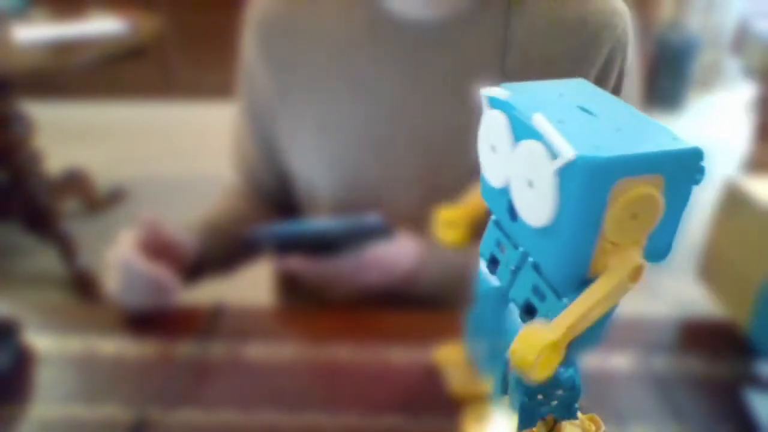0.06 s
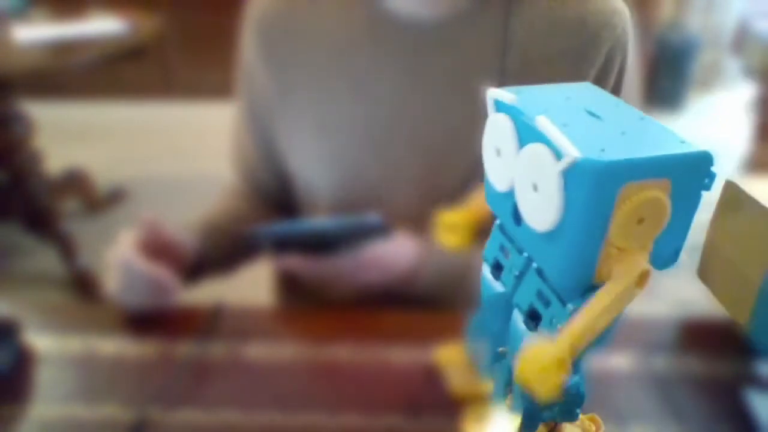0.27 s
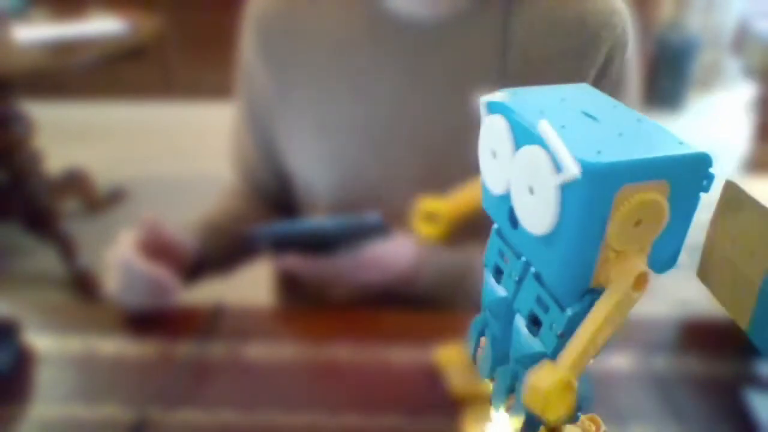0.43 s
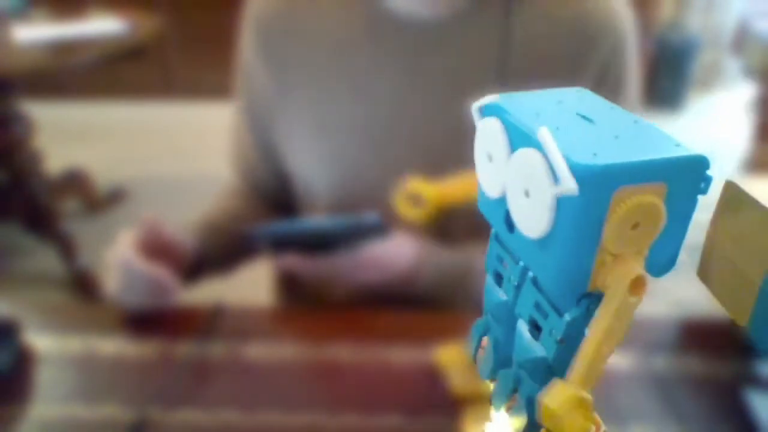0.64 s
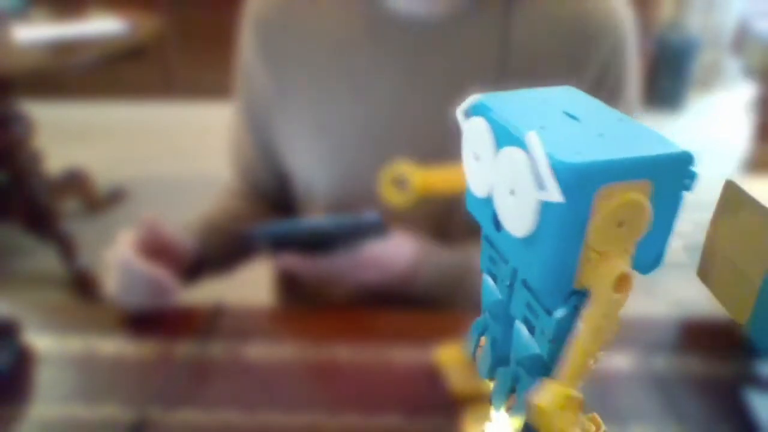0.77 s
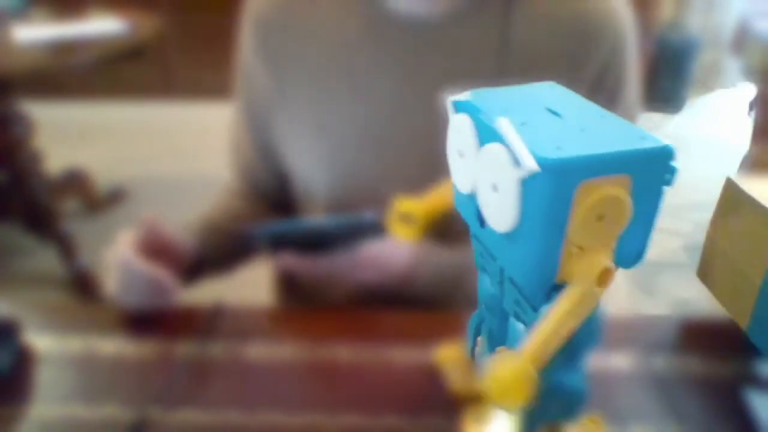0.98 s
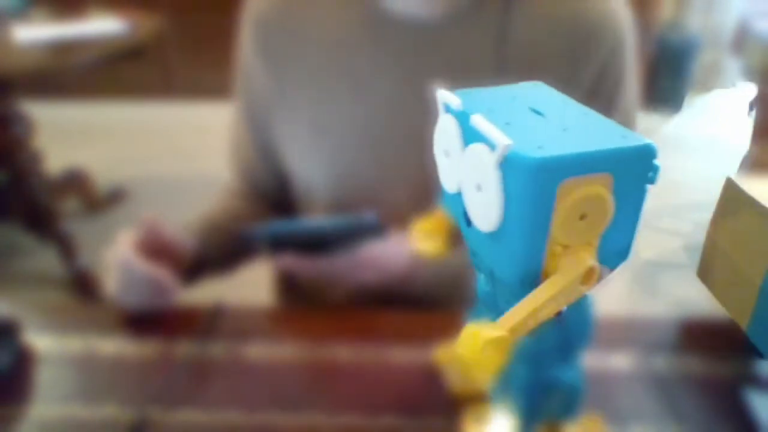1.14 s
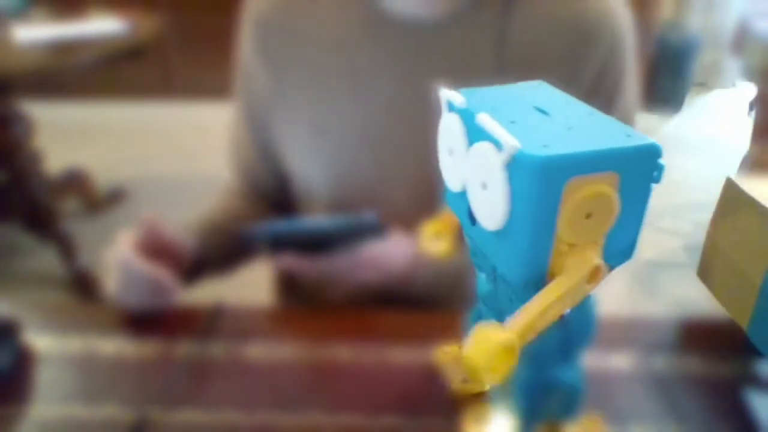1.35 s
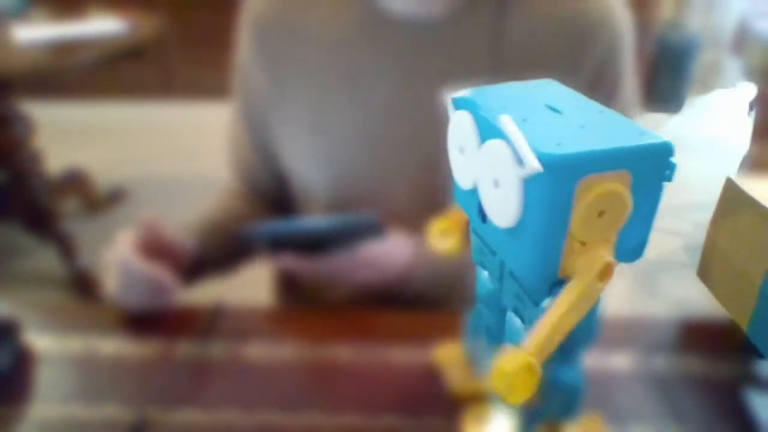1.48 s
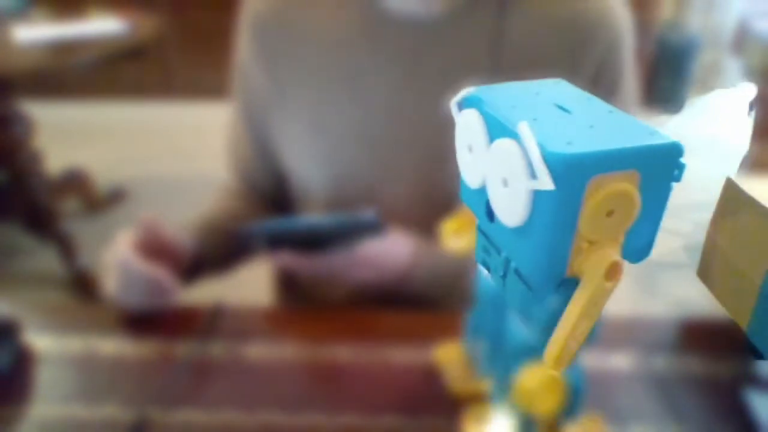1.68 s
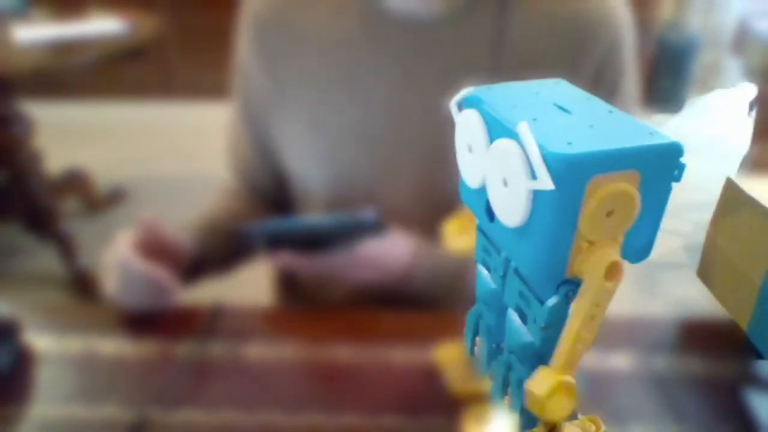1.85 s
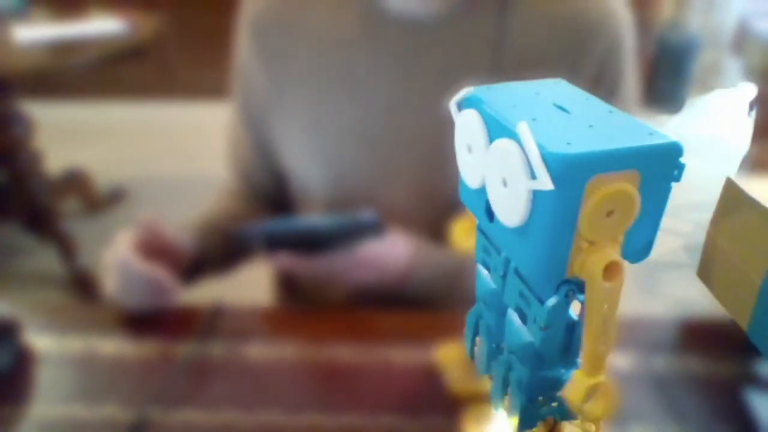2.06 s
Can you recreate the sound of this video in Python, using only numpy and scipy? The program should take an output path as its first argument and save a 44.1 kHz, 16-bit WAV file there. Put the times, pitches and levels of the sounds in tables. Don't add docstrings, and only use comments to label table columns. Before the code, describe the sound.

Tiny geared servos of a plastic robot buzz harshly up close, first in long rattly whirs for about a second, then in brief, quieter twitches, in a quiet room through a narrow-band microphone.

```python
import sys
import numpy as np
from scipy import signal
from scipy.fft import rfft, irfft
from scipy.io import wavfile
from scipy.ndimage import uniform_filter1d

SR = 44100
rng = np.random.default_rng(int(sys.argv[2]) if len(sys.argv) > 2 else 0)


def int16_out(signal):
    q = np.round(np.clip(np.atleast_2d(signal).T, -1, 1) * 32767)
    wavfile.write(sys.argv[1], SR, q.astype(np.int16))


def voltage_ratio(level):
    return 10 ** (np.asarray(level, float) / 20)


N = 93403

# [f/Hz, width/Hz, level/dB]
LEG_CASE = [(3190, 120, -11.5), (3837, 390, -11.5), (3940, 100, -11.5), (4340, 170, -9), (4904, 215, -2),
            (5280, 1400, -2.5), (5288, 260, -2), (5864, 220, 2), (6176, 300, -5.5), (6410, 100, -4),
            (6870, 190, -6.5)]
ARM_CASE = [(3234, 180, -4.5), (3540, 250, -10.5), (3836, 470, -6), (4560, 620, -6.5), (5235, 460, -0.5),
            (5740, 780, -8), (6320, 230, -2.5), (6820, 690, -11.5)]
HIP_CASE = [(3887, 190, -8.5), (4300, 300, -30), (5170, 320, -0.5), (5700, 400, -25), (6860, 500, -15)]
BROW_CASE = [(4600, 590, -17.5), (5480, 370, -6), (5840, 330, -1.5), (6730, 170, -3)]
FOOT_CASE = [(3230, 250, -11), (3775, 94, -9.5), (4450, 180, -3), (5100, 330, 2), (5600, 220, 0.5),
             (5800, 390, -5.5), (6230, 250, -16.5)]
IDLE_CASE = [(3357, 240, -7.5), (4170, 900, -13.5), (5280, 390, 0.5), (5440, 690, -4.5), (6070, 390, -7.5),
             (7040, 600, -17)]
# [f/Hz, width/Hz, level/dB]
BODY_MODES = [(1463, 190, -2), (1674, 300, -7.5), (2040, 560, -5), (2290, 160, -9.5)]
# [t/s, level/dB, body share/dB]
LEG_MOVES = [
    [(0, -27.5, -28), (.025, -35.5, -30.5), (.05, -36, -27), (.12, -35.5, -27.5), (.176, -35, -26),
     (.2, -41, -16.5), (.22, -48, -19)],
    [(.795, -44, -18.5), (.812, -34.5, -22), (.842, -32, -25), (.862, -32, -23.5), (.885, -34, -28.5),
     (.91, -37.5, -22), (.95, -35.5, -26), (1.0, -35.5, -34)],
    [(1.0, -34.5, -26), (1.04, -36.5, -33.5), (1.065, -36, -37), (1.09, -37, -32.5), (1.155, -37, -26),
     (1.19, -40, -23.5), (1.215, -48.5, -20)],
]
ARM_MOVES = [
    [(.25, -52.5, -18), (.286, -46.5, -13), (.33, -40.5, -15), (.37, -43.5, -9), (.4, -41, -16.5),
     (.44, -42, -21), (.472, -44.5, -14), (.52, -37.5, -24.5)],
    [(.52, -40, -14.5), (.575, -39.5, -16.5), (.62, -37, -17.5), (.655, -39, -16), (.68, -36, -18),
     (.708, -35.5, -24.5), (.745, -51.5, -13), (.775, -42, -24), (.79, -49.5, -26.5)],
]
# [t/s, length/s, level/dB, body share/dB]
LEG_PUSHES = [
    (0.224, 0.017, -39.5, -23),
    (1.354, 0.043, -50, -18),
    (1.497, 0.054, -50, -27),
]
HIP_PUSHES = [(1.226, 0.008, -44.5, -20.5), (1.251, 0.008, -42.5, -24), (1.288, 0.016, -52, -27),
              (1.311, .02, -40, -26.5), (1.337, .005, -45.5, -16), (1.363, 0.018, -44, -38),
              (1.389, 0.004, -47, -20), (1.4, 0.012, -49, -19.5), (1.438, 0.046, -50.5, -37),
              (1.503, .014, -46.5, -21.5), (1.546, 0.023, -51, -36), (1.596, 0.013, -51.5, -47),
              (1.61, 0.031, -52, -56)]
BROW_PUSHES = [
    (1.646, 0.017, -46.5, -49),
    (1.675, 0.0026, -42, -47),
    (1.689, 0.023, -40.5, -36.5),
    (1.716, .003, -60.5, -31),
]
FOOT_PUSHES = [
    (1.848, 0.0031, -61.5, -32),
    (1.874, 0.054, -54.5, -20.5),
    (1.9, 0.011, -45, -35.5),
    (1.915, 0.024, -45, -32.5),
    (1.948, 0.014, -48, -26),
    (1.963, 0.038, -54, -23),
    (2.021, 0.029, -50.5, -21.5),
    (2.074, 0.0033, -52, -18),
    (2.086, 0.039, -47, -24),
    (2.108, .02, -60, -3),
]
# [t/s, length/s, f/Hz, level/dB]
PANELS = [(.01, .02, 1440, -59), (.138, .006, 1440, -62), (.164, .008, 1440, -61), (.27, .005, 3170, -44),
          (.298, .025, 3200, -52), (.457, .006, 3700, -46), (.3, .012, 2080, -60), (.385, .022, 474, -69),
          (.41, .011, 3250, -40), (.47, .012, 3200, -50), (.536, .01, 3250, -47), (.553, .008, 3350, -41),
          (.66, .025, 3750, -45), (.609, .01, 3180, -46), (.612, .03, 474, -69), (.676, .018, 3200, -43),
          (.772, .008, 1050, -66), (.829, .008, 3290, -46), (.856, .01, 3750, -45), (.882, .008, 3700, -45),
          (.9, .004, 3150, -51), (.925, .005, 3150, -51), (.948, .004, 3150, -52), (.968, .006, 3150, -50),
          (.988, .004, 3150, -52), (.86, .022, 474, -68), (.97, .015, 1440, -56), (1.061, .008, 3250, -55),
          (1.233, .008, 3930, -48), (1.317, .008, 3850, -48), (1.385, .02, 1065, -72),
          (1.442, .01, 3850, -57), (1.46, .008, 3850, -52), (1.606, .014, 3950, -58),
          (1.63, .01, 4100, -54), (1.848, .01, 2270, -71), (1.915, .028, 1070, -72),
          (2.086, .04, 1070, -66), (2.086, .012, 3790, -56), (2.088, .012, 4350, -53),
          (2.104, .012, 4350, -51), (2.105, .012, 3790, -55)]
# [t/s, length/s, f/Hz, level/dB]
CATCHES = [(.01, .012, 5900, -36), (.127, .005, 5960, -37), (.164, .005, 5200, -38),
           (.231, .012, 5350, -39), (.332, .008, 5150, -39), (.35, .012, 5200, -42),
           (.365, .006, 5250, -36), (.446, .004, 5110, -43), (.487, .012, 5200, -42),
           (.517, .006, 5150, -42), (.546, .012, 5170, -41), (.61, .01, 5150, -38), (.627, .005, 5250, -37),
           (.672, .007, 5100, -39), (.702, .007, 5150, -38), (.773, .004, 5120, -46),
           (.799, .006, 5890, -41), (.811, .005, 5430, -37), (.88, .012, 6050, -39),
           (.947, .005, 5200, -38), (.963, .008, 5750, -39), (.984, .005, 4770, -35),
           (.996, .012, 5850, -38), (1.024, .004, 5000, -37), (1.097, .005, 5350, -38),
           (1.146, .004, 5300, -38), (1.163, .006, 5800, -35), (1.234, .005, 5100, -42),
           (1.3035, .001, 5200, -33), (1.312, .001, 5300, -38), (1.316, .001, 5200, -38),
           (1.321, .004, 5200, -33), (1.388, .002, 5100, -34), (1.442, .009, 5250, -43),
           (1.457, .004, 5250, -38), (1.466, .002, 5200, -38), (1.524, .004, 5200, -42),
           (1.612, .005, 5250, -43), (1.6265, .001, 5150, -37), (1.632, .003, 5250, -38)]
# [f/Hz, width/Hz, level/dB]
FRAME_MODES = [(134, 60, -3), (331, 60, -7.5), (481, 76, -5.5), (690, 680, -11), (1031, 130, -4)]
# [t/s, level/dB]
HUM_CURVE = [(0, -64.5), (.55, -63.5), (.62, -60.5), (.65, -75.5), (.8, -71), (.86, -60.5), (1.0, -66),
             (1.04, -91.5), (1.3, -87), (1.33, -65), (1.42, -81.5), (1.8, -93.5), (2.12, -65.5)]
# [f/Hz, level per Hz/dB]
ROOM_SPECTRUM = [(18, -50), (30, -13), (87, -2.5), (218, -10.5), (297, -10), (340, -9.5), (472, -12.5),
                 (667, -23), (3000, -25), (3900, -50.5), (6600, -120)]

LEG_TURN_HZ, ARM_TURN_HZ, HIP_TURN_HZ, FOOT_TURN_HZ = 361.7, 254.9, 175, 334
WANDER_DB, TWITCH_WANDER_DB, BODY_WANDER_DB = 1.5, 0.5, 2.2


def servo(modes, turn_hz, moves=(), pushes=()):
    t = np.arange(N) / SR
    rise, fall = 2397.5, 2399.5
    near, deep = 0, 0
    for rows in moves:
        s, db, body_db = np.array(rows).T
        gain = voltage_ratio(np.interp(t, s, db)) * push(s[0], s[-1] - s[0], rise, fall)
        near = np.maximum(near, gain)
        deep = np.maximum(deep, gain * voltage_ratio(np.interp(t, s, body_db)))
    for start, length, db, body_db in pushes:
        gain = voltage_ratio(db) * push(start, length, rise, fall)
        near = np.maximum(near, gain)
        deep = np.maximum(deep, gain * voltage_ratio(body_db))
    wander_db = WANDER_DB if moves else TWITCH_WANDER_DB
    from_case = edge(near * case(modes, turn_hz, wander_db))
    from_body = deep * case(BODY_MODES, turn_hz, BODY_WANDER_DB)
    return from_case + from_body


def case(modes, turn_hz, wander_db=WANDER_DB):
    main_gear = teeth() * turning(turn_hz)
    other_gear = teeth() * turning(turn_hz)
    wander = voltage_ratio(wander_db * walk(40))
    shared = 0.55
    lags = rng.integers(N, size=len(modes))
    total = 0
    for lag, (hz, width_hz, db) in zip(lags, modes):
        drive = np.sqrt(shared) * main_gear + np.sqrt(1 - shared) * np.roll(other_gear, lag)
        total = total + voltage_ratio(db) * np.roll(wander, lag) * ring(drive, hz, width_hz)
    return unit(total)


def teeth():
    teeth_per_s, spread_db, most_db = 3000, 3, 5
    chance = rng.random(N)
    hardness = rng.exponential(size=N)
    sign = np.sign(rng.random(N) - 0.5)
    db = np.minimum(spread_db * hardness, most_db) + 0.8 * walk(110)
    return unit((chance < teeth_per_s / SR) * sign * voltage_ratio(db))


def turning(hz):
    depth, drift = 0.5, 0.012
    turns = np.cumsum(hz * (1 + drift * walk(8.8))) / SR
    return 1 + depth * np.cos(2 * np.pi * turns)


def ring(x, hz, width_hz):
    b, a = signal.iirpeak(hz, hz / max(width_hz, 10), fs=SR)
    once = signal.lfilter(b, a, x)
    skirt_db = -20
    return signal.lfilter(b, a, once) + voltage_ratio(skirt_db) * once


def edge(x):
    return signal.sosfilt(signal.ellip(5, 1, 30, 2866, "high", fs=SR, output="sos"), x)


def push(start, length, rise, fall):
    t = np.arange(N) / SR
    before = np.maximum(start - t, 0)
    after = np.maximum(t - start - length, 0)
    return voltage_ratio(-rise * before - fall * after)


def walk(rate):
    hold = int(SR / rate)
    levels = rng.standard_normal(N // 40)[:N // hold + 1]
    slewed = uniform_filter1d(np.repeat(levels, hold), hold)
    return unit(uniform_filter1d(slewed, hold)[:N])


def unit(x):
    return x / np.sqrt(np.mean(x ** 2))


def panels():
    bent_time = np.cumsum(1 + 0.024 * walk(900)) / SR
    flutter = voltage_ratio(2.5 * walk(450))
    total = 0
    for start, length, hz, db in PANELS + CATCHES:
        gain = voltage_ratio(db) * push(start, length, 3500, 3500)
        total = total + gain * np.sqrt(2) * flutter * np.sin(2 * np.pi * hz * bent_time)
    return total


def frame_hum():
    s, db = np.array(HUM_CURVE).T
    strength = voltage_ratio(np.interp(np.arange(N) / SR, s, db))
    return case(FRAME_MODES, ARM_TURN_HZ, BODY_WANDER_DB) * strength


def echo(robot):
    t60_s, level_db = 0.1, -13
    t = np.arange(SR // 2) / SR
    tail = rng.standard_normal(len(t)) * voltage_ratio(-60 * t / t60_s)
    tail = tail / np.sqrt(np.sum(tail ** 2))
    return voltage_ratio(level_db) * signal.fftconvolve(robot, tail)[:N]


def idle():
    return edge(case(IDLE_CASE, FOOT_TURN_HZ))


def room():
    f = np.maximum(np.arange(N // 2 + 1) * SR / N, 1)
    hz, db = np.array(ROOM_SPECTRUM).T
    shape = voltage_ratio(np.interp(np.log(f), np.log(hz), db))
    noise = irfft(rfft(rng.standard_normal(N)) * shape, N)
    return voltage_ratio(-67) * unit(noise)


def scene():
    robot = servo(LEG_CASE, LEG_TURN_HZ, LEG_MOVES, LEG_PUSHES)
    robot = robot + servo(ARM_CASE, ARM_TURN_HZ, moves=ARM_MOVES)
    robot = robot + servo(HIP_CASE, HIP_TURN_HZ, pushes=HIP_PUSHES)
    robot = robot + servo(BROW_CASE, FOOT_TURN_HZ, pushes=BROW_PUSHES)
    robot = robot + servo(FOOT_CASE, FOOT_TURN_HZ, pushes=FOOT_PUSHES)
    robot = robot + panels()
    robot = robot + frame_hum()
    idling = idle()
    reflected = echo(robot)
    breath_db = 1.5 * walk(5.6)
    return (robot + reflected + idling * voltage_ratio(-59 + breath_db) + room())[None]


def top_cut(x):
    return signal.sosfilt(signal.butter(12, 15700, fs=SR, output="sos"), x)


def record(dry):
    soft = signal.sosfilt(signal.butter(6, 7250, fs=SR, output="sos"), dry)
    soft = signal.sosfilt(signal.butter(4, 48, "high", fs=SR, output="sos"), soft)
    cut = signal.sosfilt(signal.ellip(11, 0.5, 62, 7400, fs=SR, output="sos"), soft)
    hiss = np.diff(rng.standard_normal(dry.shape), prepend=0) / 1.5
    return top_cut(cut + voltage_ratio(-93.5) * hiss)


dry = scene()
out = record(dry)
int16_out(out)
```